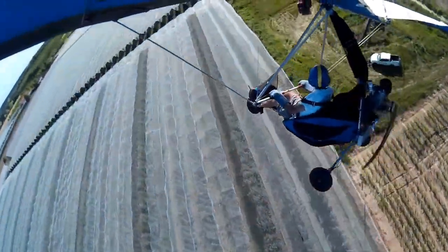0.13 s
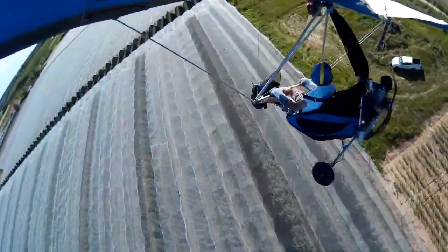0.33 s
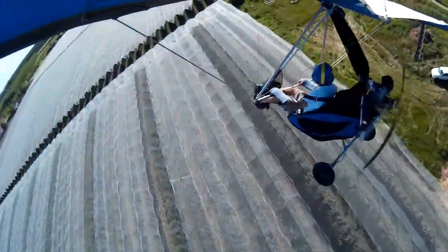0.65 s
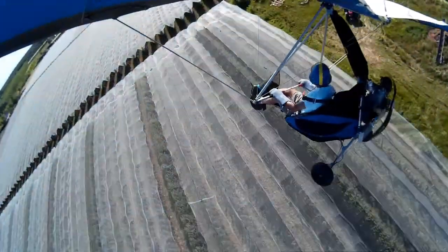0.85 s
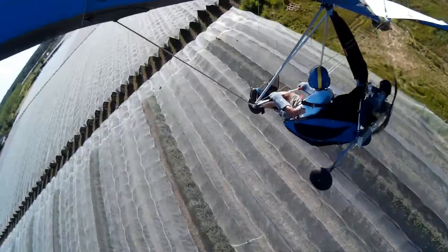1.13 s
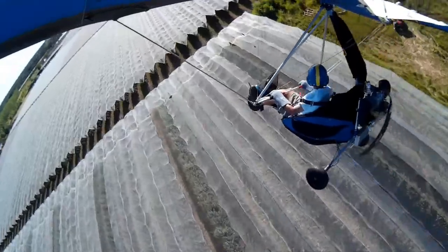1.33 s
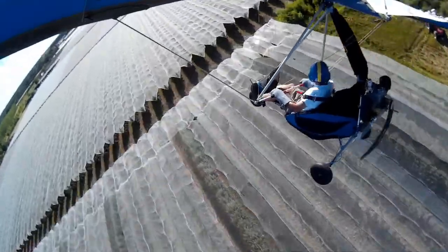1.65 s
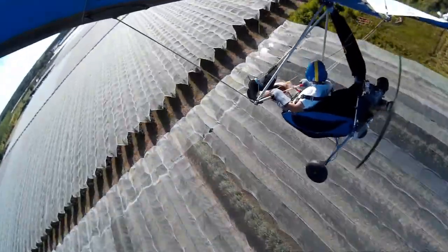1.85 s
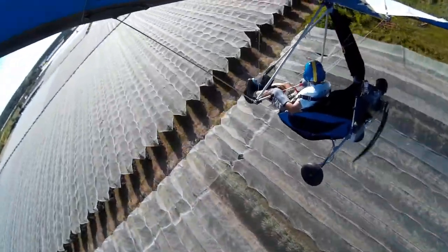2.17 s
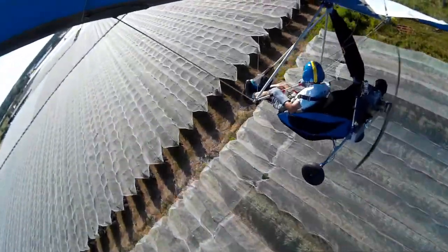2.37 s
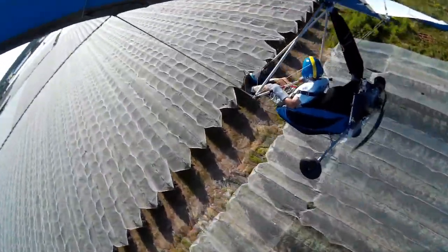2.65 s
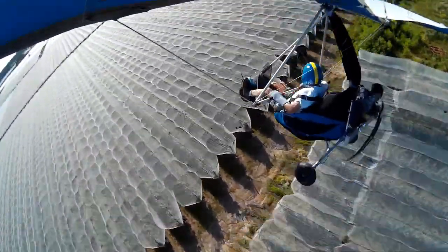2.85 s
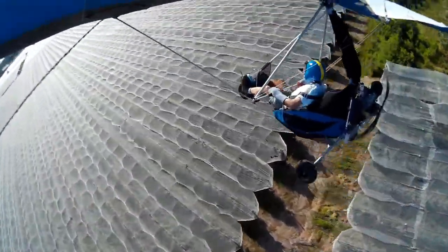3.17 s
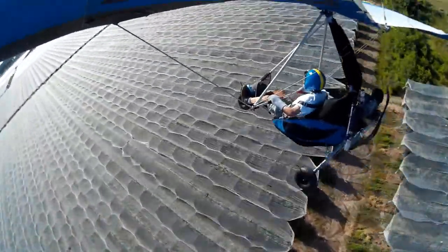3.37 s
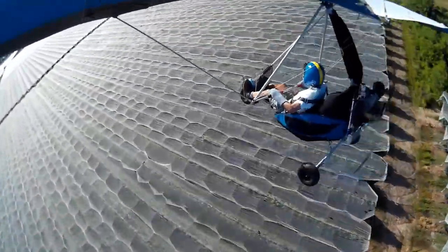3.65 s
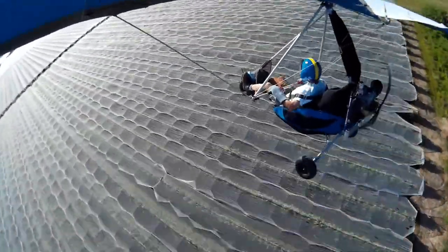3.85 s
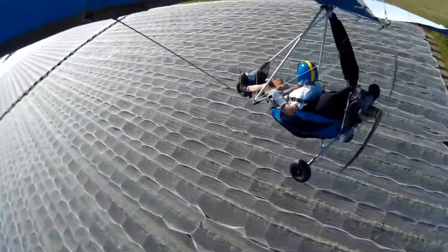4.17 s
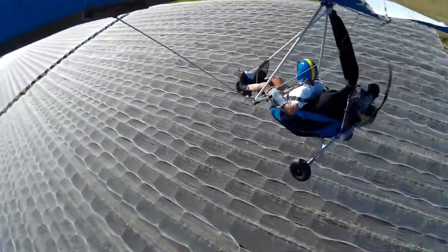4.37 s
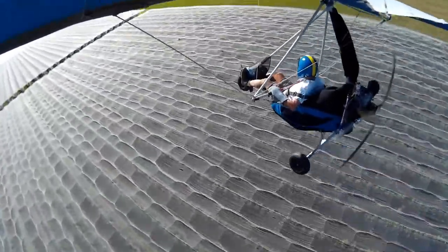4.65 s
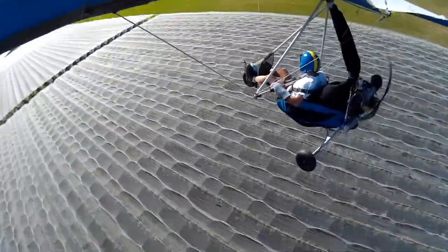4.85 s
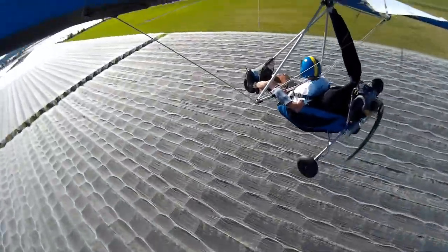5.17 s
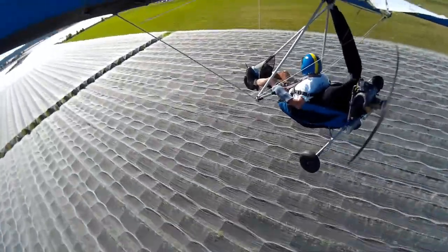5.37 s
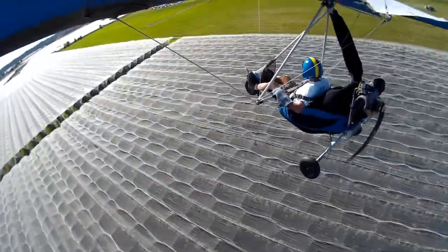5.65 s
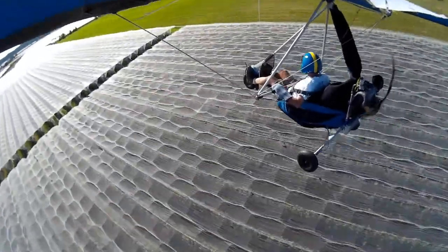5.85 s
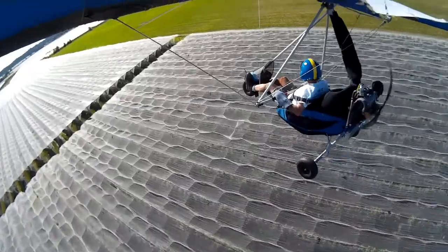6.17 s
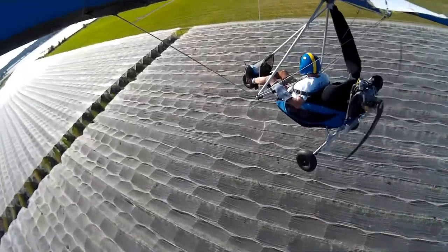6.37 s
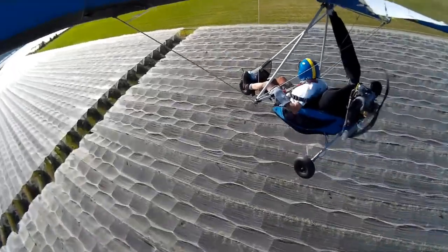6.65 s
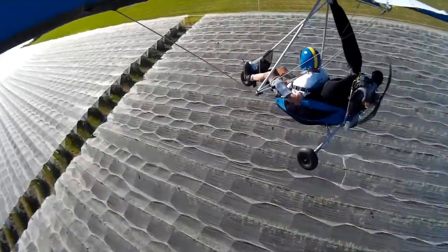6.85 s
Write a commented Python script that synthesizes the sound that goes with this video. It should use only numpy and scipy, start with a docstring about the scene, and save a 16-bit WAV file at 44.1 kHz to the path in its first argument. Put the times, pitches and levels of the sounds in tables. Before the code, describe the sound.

A droning, clattering microlight engine flies under buffeting low wind roar that falls away mid-flight, baring the propeller, before distorting gusts surge back.

```python
"""A microlight trike cruises with a droning, clattering engine, heard by a microphone out on its wing.
Wind rumbles, thumps and overloads the microphone; around 3-4 s it drops and the engine comes through.
The engine fires about 120 times a second and turns a geared pusher propeller that chops the exhaust.
Tones make the drone; pulsing, filtered noise makes the propeller's roar and, with repeated knocks, the
clatter. The wind is filtered noise, many separate eddies and some short buffets."""
import sys
import numpy as np
from scipy import signal
from scipy.fft import rfft, irfft
from scipy.io import wavfile
from scipy.ndimage import map_coordinates

SR = 44100
rng = np.random.default_rng(int(sys.argv[2]) if len(sys.argv) > 2 else 0)


def unload_audio(sound):
    """Save the sound as a 16-bit wav file, at the path given as the first command line argument."""
    columns = np.transpose(np.atleast_2d(sound))
    # keep every value between -1 and 1, then stretch to whole-number steps
    steps = np.round(np.clip(columns, -1, 1) * 32767)
    wavfile.write(sys.argv[1], SR, steps.astype(np.int16))


N = 309582
TIME, HZ = np.arange(N) / SR, np.fft.rfftfreq(N, 1 / SR)

# The slow course of the wind on the microphone: it builds, falls away and returns stronger.
# Each row: time in seconds, level in dB before gusts and lulls.
WIND_COURSE = [(0.0, -14), (0.45, -12.5), (0.6, -9.5), (1.4, -8), (2.05, -5), (2.78, -8), (3.0, -18.5),
               (3.3, -24.5), (4.05, -20.5), (4.35, -12.5), (4.65, -4.5), (6.1, -3.5), (6.5, -5.5),
               (7.0, -4.5)]
# Buffets of wind at set times, several of them hard.
# Each row: start in seconds, peak in dB before the overall buffet level.
SET_BUFFETS = [(0.213, -2), (0.449, 2.5), (0.668, 6), (2.941, 4), (3.946, -2), (4.184, 2.5), (4.332, 0.5),
               (4.464, 0.5)]
# Tone colour of the steady wind rumble. Each row: frequency in Hz, relative level in dB per Hz.
WIND_COLOUR = [(20, -23), (40, -10), (80, -4.5), (160, 0), (260, -0.5), (450, -3.5), (600, -6.5),
               (750, -17), (1000, -30), (1600, -63), (4000, -60)]
# Tone colour of one eddy passing the microphone. Each row: frequency in Hz, relative level in dB per Hz.
EDDY_COLOUR = [(20, -18.5), (60, -11), (120, -1), (190, 1.5), (300, -1), (450, -2), (580, -5), (750, -19.5),
               (1000, -34.5), (2000, -58), (4000, -69.5)]
# The broad roar and swish of the propeller. Each row: frequency in Hz, relative level in dB per Hz.
ROAR_COLOUR = [(20, -22), (45, -8), (75, 1.5), (200, -2.5), (500, 0), (650, -4), (780, -9.5), (920, -16),
               (1350, -21.5), (1750, -17), (2100, -14), (2750, -28), (3200, -22), (3700, -36), (6000, -50)]
# The metallic clatter of the engine. Each row: frequency in Hz, relative level in dB per Hz.
CLATTER_COLOUR = [(500, -2), (1200, -11.5), (1700, -4), (2400, -4.5), (2750, -11.5), (3350, -10.5),
                  (3700, -13), (4700, -13), (7300, -15), (8400, -27), (10000, -26.5), (11500, -20),
                  (13500, -22.5), (15500, -40)]
# Resonances and notches of the engine casing.
# Each row: centre in Hz, width in Hz, boost or cut in dB on top of the clatter colour.
CASING = [(2030, 710, 5.5), (3110, 820, 8.5), (3710, 160, -4.5), (4034, 360, 6), (5350, 310, 6),
          (6050, 490, 5.5), (7300, 240, 3.5), (9450, 360, 4.5), (10000, 300, -3.5), (10950, 1260, 9),
          (12050, 350, -4), (13100, 670, 5.5)]
# How the clatter changes. Each row: time in seconds, level change in dB, treble shelf in dB.
CLATTER_COURSE = [(0, -1, 1), (1, 0.1, -1.5), (2, 0, 1), (2.7, 0.5, 0), (3.4, 1.5, -0.5), (4.2, 1.5, -2.5),
                  (5, 1, -1), (6, 0.5, -3.5), (7, -2, -2)]
# How much of the clatter repeats from firing to firing.
# Each row: frequency in Hz, level of the knocks in dB relative to the hiss.
KNOCK_COLOUR = [(1000, -18), (2000, -2.5), (2800, -11.5), (4500, -9), (5400, 0), (6500, -4), (7300, 2),
                (9000, -8), (11000, -1.5), (13000, -4), (15000, -8)]
# Engine speed: a gentle opening of the throttle, a hold, an easing off.
# Each row: time in seconds, engine firings per second before a slight unsteadiness.
ENGINE_SPEED = [(0.6, 117.1), (1.4, 119.0), (2.55, 120.0), (3.6, 120.0), (4.5, 119.35), (5.0, 119.9),
                (5.5, 119.05), (6.4, 115.9), (6.9, 115.25)]
# Tones at sums of the firing and blade rates.
# Each row: multiple of the firing rate, multiple of the blade rate, level in dB rms before wavering.
TONES = [(1, 0, -35.2), (2, 0, -33.0), (3, 0, -37.3), (4, 0, -33.7), (7, 0, -47.0), (8, 0, -51.3),
         (14, 0, -52.4), (18, 0, -54.6), (0, 1, -31.4), (0, 2, -31.2), (0, 3, -30.7), (0, 6, -33.7),
         (0, 7, -35.1), (2, 1, -30.5), (2, 2, -26.9), (2, 3, -30.2), (2, 4, -36.5), (2, 5, -39.8)]

BLADES_PER_FIRING = .7039  # propeller blades passing for each engine firing
# more buffets come by chance: at most this many a second, rarely when the wind is below the onset
BUFFETS_PER_S, BUFFET_ONSET_DB = 8, -17.5
BUFFET_DB, BUFFET_SPREAD_DB = -1.5, 1  # their typical size before the overall level, and its spread
# now and then the wind lets go of the microphone for an instant
LULLS_PER_S, LULL_DB, LULL_S = 1.5, -8, .011
GUST_DB, GUST_HZ = 1.0, 7  # small gusts: rms size, and roughly their fastest rate
EDGE_HZ = 15650  # top of the band that is kept


def amp(db):
    """Turns decibels into gain."""
    return 10 ** (np.asarray(db) / 20)


def unit(x):
    """Scales a signal to rms 1."""
    return x / np.sqrt(np.mean(x ** 2) + 1e-20)


def curve(rows, axis=1):
    """Joins one column of a time table with straight lines, giving a value at every sample."""
    rows = np.array(rows)
    return np.interp(TIME, rows[:, 0], rows[:, axis])


def spectrum(points):
    """Gives dB at every frequency, joining the points on a log frequency axis."""
    hz, db = np.transpose(points)
    return np.interp(np.log(HZ + 1), np.log(hz), db)


def coloured(x, db):
    """Filters a signal by a dB spectrum and scales it to rms 1."""
    return unit(irfft(rfft(x) * amp(db), N))


def noise():
    """White noise: every frequency equally strong."""
    return rng.standard_normal(N)


def drift(rate_hz):
    """Smooth random movement up to about this rate, at rms 1."""
    return unit(irfft(rfft(noise()) * np.exp(-(HZ / rate_hz) ** 2), N))


def chance_times(per_s):
    """Moments scattered at random, at a rate that may change over time."""
    return TIME[rng.random(N) < per_s / SR]


def beat(cycles, sharpness):
    """One rounded pulse of power per cycle, with mean 1."""
    pulse = np.exp(sharpness * np.cos(2 * np.pi * cycles))
    return pulse / pulse.mean()


def wind_strength():
    """Wind pressure as a gain: the slow course with small gusts, cut by brief chance lulls."""
    lulls = np.zeros(N)
    for s in chance_times(LULLS_PER_S):
        near = abs(TIME - s) < 4 * LULL_S
        lull = np.exp(-((TIME[near] - s) / LULL_S) ** 2)
        lulls[near] = np.maximum(lulls[near], lull)
    return amp(curve(WIND_COURSE) + GUST_DB * drift(GUST_HZ) + LULL_DB * lulls)


def rush(strength):
    """The continuous rumble of air on the microphone, fluttering in quick lumps."""
    level_db, flutter_db = -2.0, 2.2
    flutter = unit(amp(flutter_db * drift(90)))
    rumble = coloured(noise(), spectrum(WIND_COLOUR))
    return amp(level_db) * strength ** 1.15 * flutter * rumble


def eddies(strength):
    """Separate eddies thump the microphone; stronger wind brings many more and slightly larger ones."""
    full_rate, level_db = 450, -1.2  # eddies per second (rms of the lumpy rate) at strength 1
    lumps = unit(amp(5 * drift(60)))
    passed = np.cumsum(full_rate * strength ** 1.7 * lumps) / SR
    # each time the count of eddies passes a whole number, one arrives with its own size and sign
    arrivals = np.diff(np.floor(passed), prepend=0)
    size = strength ** .24 * rng.uniform(.55, 1.35, N) * rng.choice([-1, 1], N)
    kicks = size * arrivals * np.sqrt(SR / full_rate)
    # minimum phase puts the push first: a sudden push, then a swing or two
    log_gain = np.log(amp(spectrum(EDDY_COLOUR)))
    mirrored = np.r_[log_gain, log_gain[-2:0:-1]]
    phase = -signal.hilbert(mirrored).imag[:len(HZ)]
    thump = irfft(np.exp(log_gain + 1j * phase), N)
    return amp(level_db) * signal.fftconvolve(kicks, thump / np.linalg.norm(thump))[:N]


def buffets(level_db=1, middle_hz=300, length_s=0.002215):
    """A large eddy gives one or two quick swings of pressure; some are set, more come by chance."""
    weakness = amp(BUFFET_ONSET_DB - curve(WIND_COURSE))
    times = chance_times(BUFFETS_PER_S / (1 + weakness ** 4))
    sizes_db = BUFFET_DB + BUFFET_SPREAD_DB * noise()[:len(times)]
    rows = list(SET_BUFFETS) + list(zip(times, sizes_db))
    out = np.zeros(N)
    for (s, db), (pitch, phase) in zip(rows, rng.random((N, 2))):
        first = max(int((s - 4 * length_s) * SR), 0)
        near = slice(first, int((s + 6 * length_s) * SR))
        t = TIME[near] - s - length_s
        swing_hz = middle_hz * 2 ** ((pitch - .5) / 2)  # up to a quarter octave either way
        swing = np.cos(2 * np.pi * (swing_hz * t + phase))
        out[near] += amp(db + level_db) * np.exp(-(t / length_s) ** 2) * swing
    return out


def roar(firings, level_db=-24):
    """Torn air behind the propeller: noise that pulses with every blade."""
    pulses = beat(firings * BLADES_PER_FIRING, 1.35)
    return amp(level_db) * coloured(noise() * np.sqrt(pulses), spectrum(ROAR_COLOUR))


def clatter(firings, level_db=-29.5):
    """Each firing repeats the same knocks and a fresh burst of hiss; both ring the casing."""
    firing_depth, stroke_depth, blade_depth = .42, .22, .27  # sharpness of the pulses
    # one random pattern of knocks, replayed at every firing
    cycle = unit(irfft(np.exp(2j * np.pi * rng.random(181))))
    knocks = map_coordinates(cycle, [firings % 1 * len(cycle)], order=3, mode="grid-wrap")
    knocks = irfft(rfft(knocks) * amp(spectrum(KNOCK_COLOUR)), N)
    power = beat(firings, firing_depth) * beat(2 * firings, stroke_depth) * beat(4 * firings, stroke_depth)
    power = power * beat(firings * BLADES_PER_FIRING, blade_depth)  # passing blades chop the sound
    colour = spectrum(CLATTER_COLOUR)
    for hz, width, db in CASING:
        colour = colour + db / (1 + (2 * (HZ - hz) / width) ** 2)
    ring = coloured((noise() + knocks) * np.sqrt(power), colour)
    treble = irfft(rfft(ring) * HZ ** 2 / (HZ ** 2 + 8000 ** 2), N)
    extra_treble = (amp(curve(CLATTER_COURSE, axis=2)) - 1) * treble
    return amp(level_db + curve(CLATTER_COURSE)) * (ring + extra_treble)


def drone(firings, waver_db=2):
    """Exhaust and blade tones, with sum tones where blades chop the exhaust; rough air wavers them."""
    out = np.zeros(N)
    for firing, blade, db in TONES:
        wobble = .022 * drift(10)  # in cycles
        phase = (firing + blade * BLADES_PER_FIRING) * firings + wobble + rng.random()
        level = amp(db + waver_db * drift(9.3))
        out += level * np.sqrt(2) * np.cos(2 * np.pi * phase)
    return out


def scene():
    """The engine speed, slightly unsteady, drives every part of the machine; wind lies over it."""
    unsteady = .0012 * drift(12)
    firings = np.cumsum(curve(ENGINE_SPEED) * (1 + unsteady)) / SR  # running count
    strength = wind_strength()
    wind = rush(strength) + eddies(strength) + buffets()
    machine = roar(firings) + clatter(firings) + drone(firings)
    return (wind + machine)[None]


def record(dry, hiss_db=-56):
    """The input overloads with a firm knee; a little hiss joins; then the top of the band is cut."""
    ceiling, knee = .695, 12  # a higher knee bends more sharply
    clipped = dry / (1 + abs(dry / ceiling) ** knee) ** (1 / knee)
    hissy = clipped + amp(hiss_db) * noise()
    low_pass = signal.firwin(801, EDGE_HZ, window=("kaiser", 9), fs=SR)
    return signal.oaconvolve(hissy, low_pass[None], "same")


dry = scene()
out = record(dry)
unload_audio(out)
```